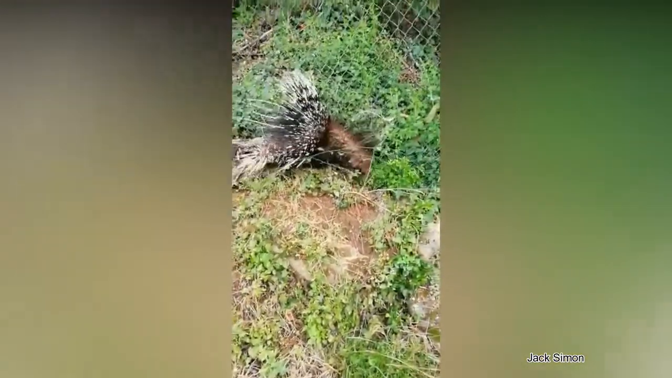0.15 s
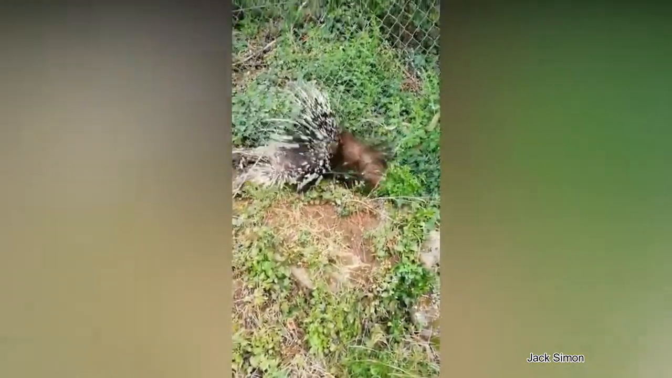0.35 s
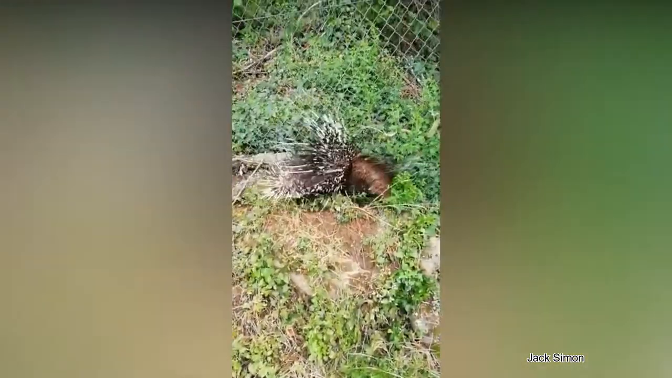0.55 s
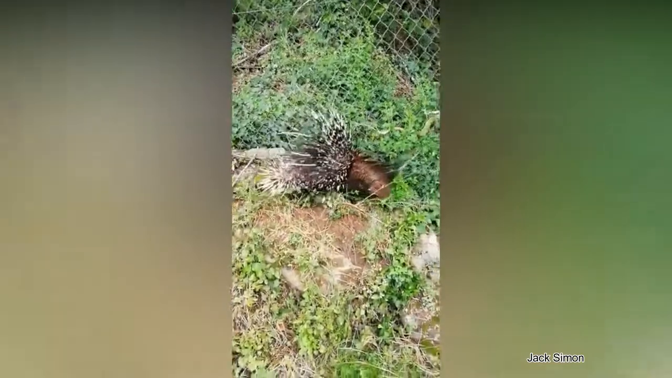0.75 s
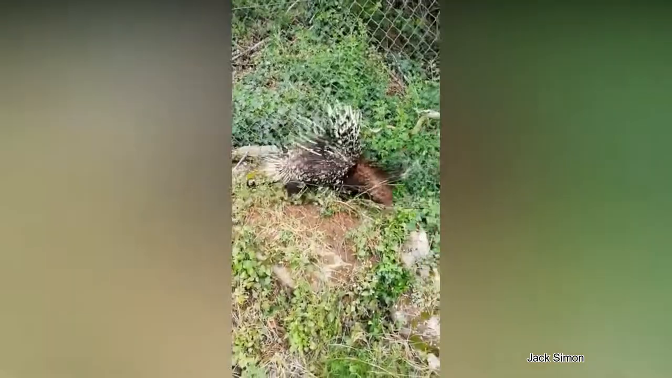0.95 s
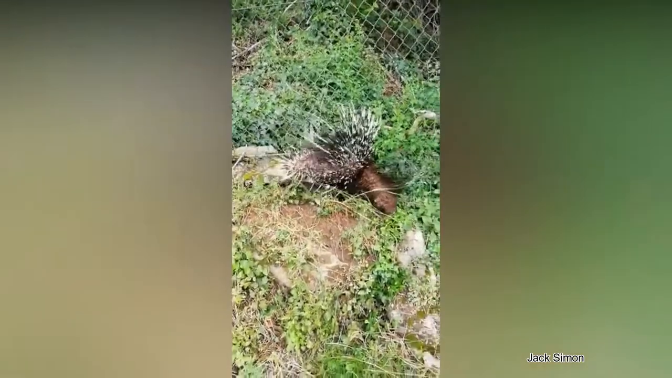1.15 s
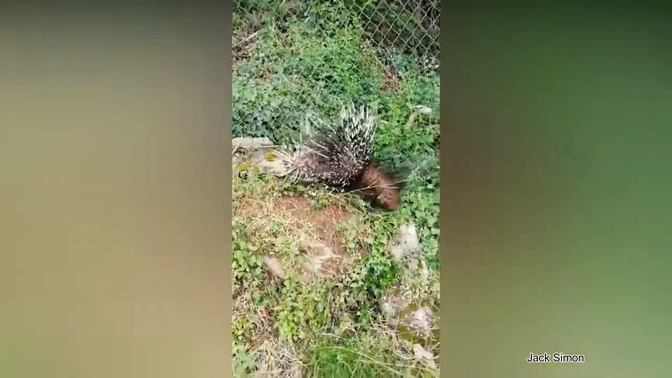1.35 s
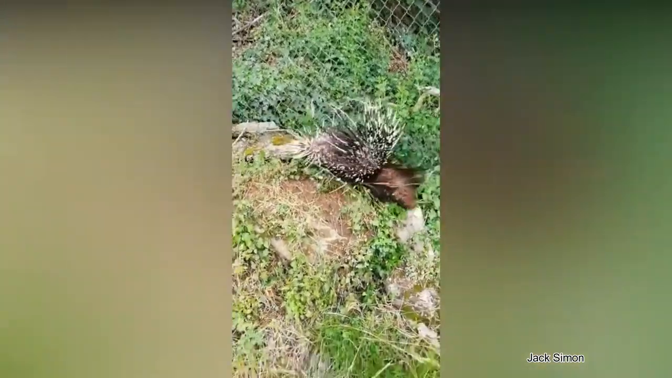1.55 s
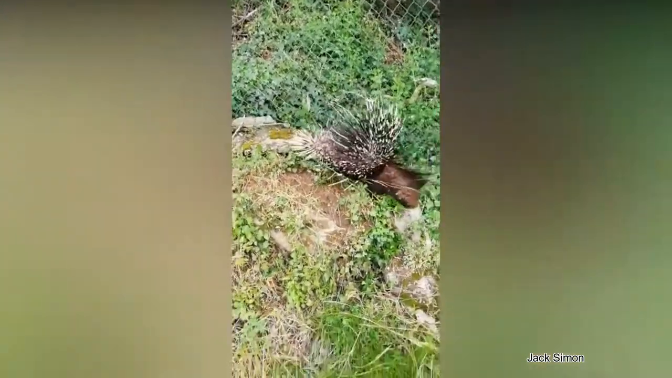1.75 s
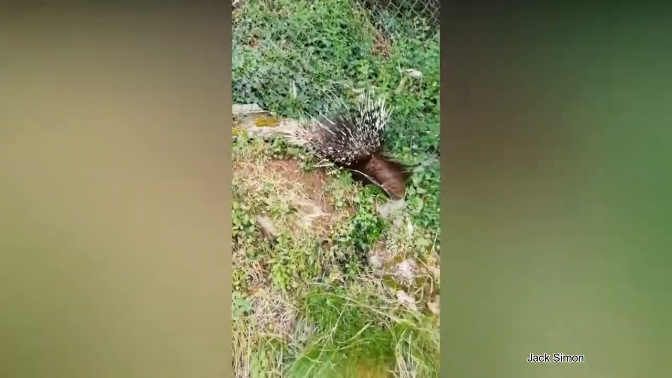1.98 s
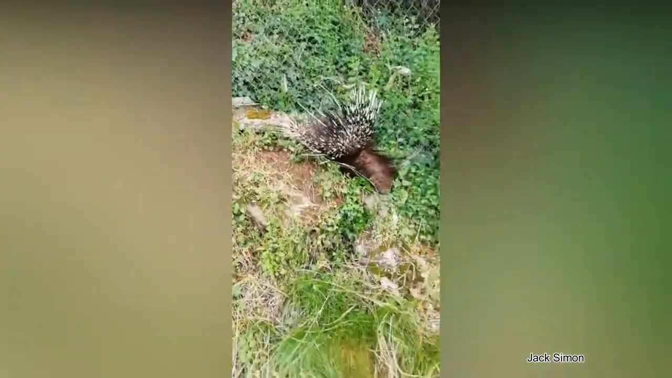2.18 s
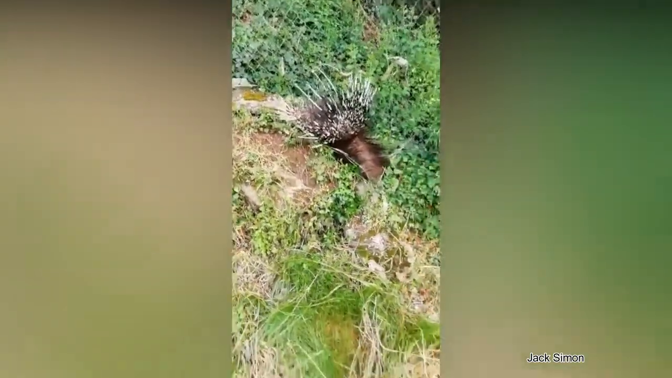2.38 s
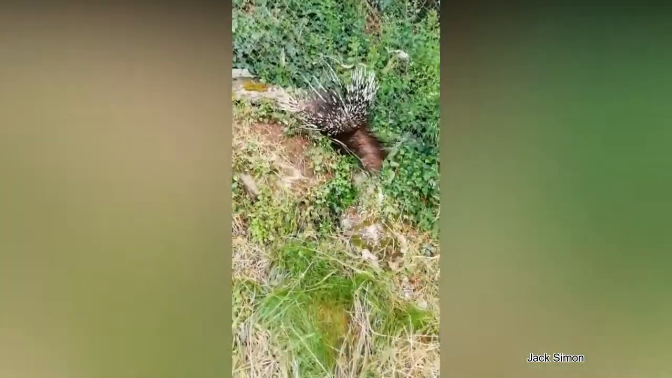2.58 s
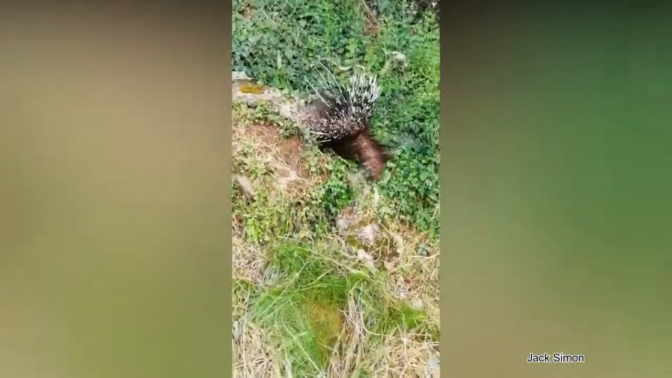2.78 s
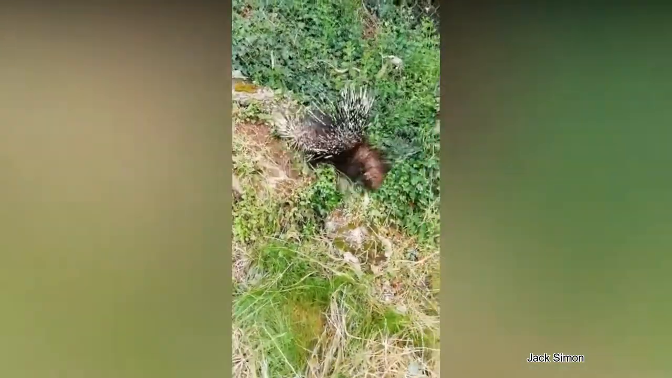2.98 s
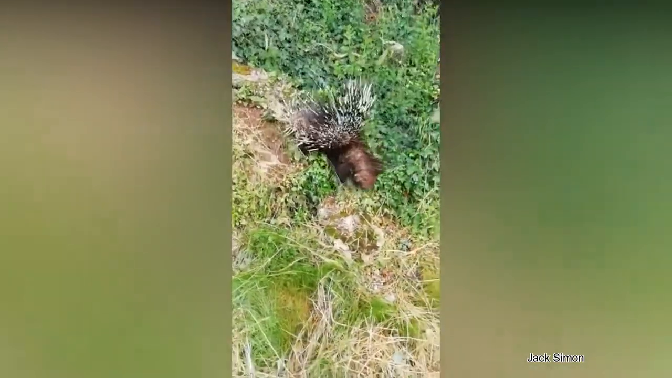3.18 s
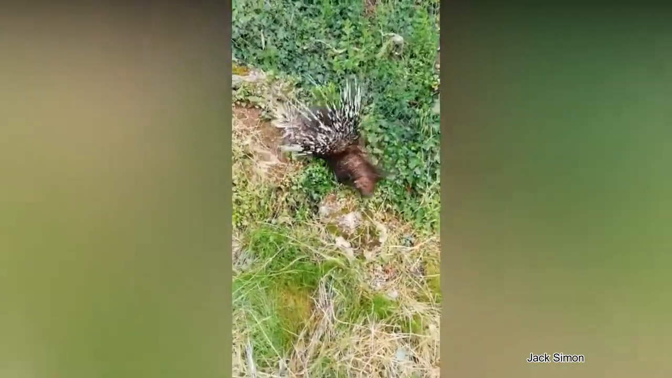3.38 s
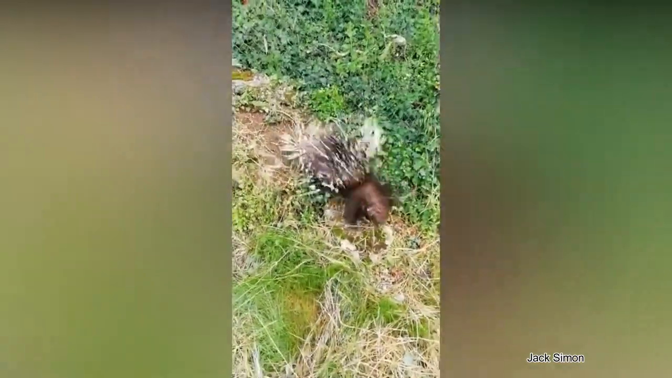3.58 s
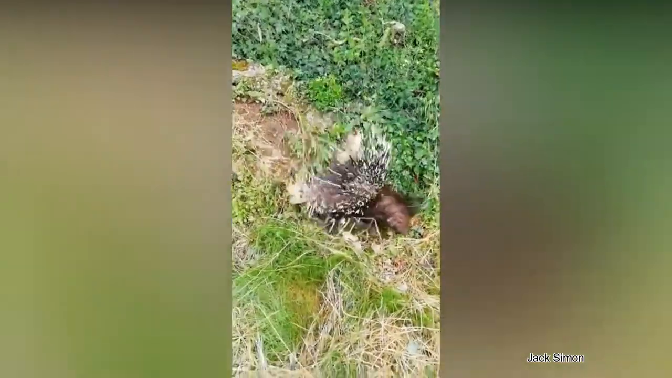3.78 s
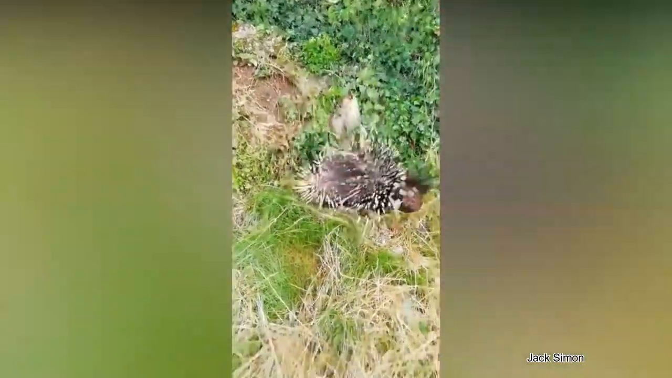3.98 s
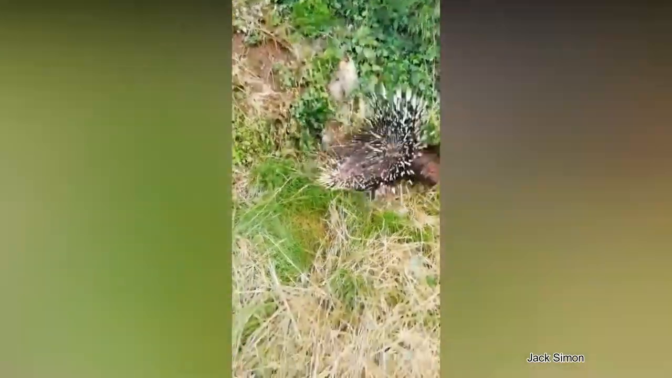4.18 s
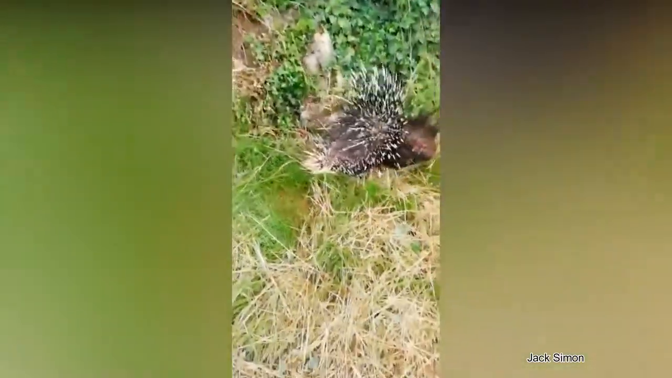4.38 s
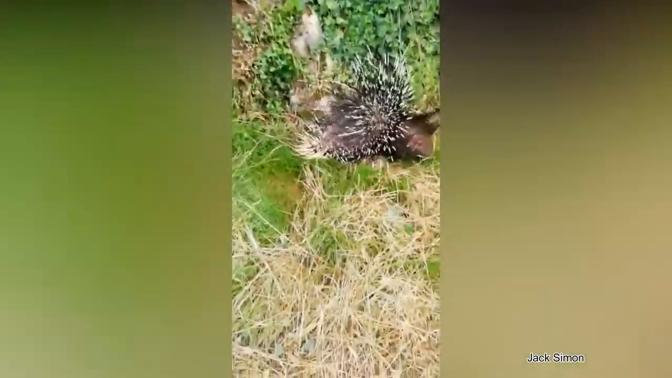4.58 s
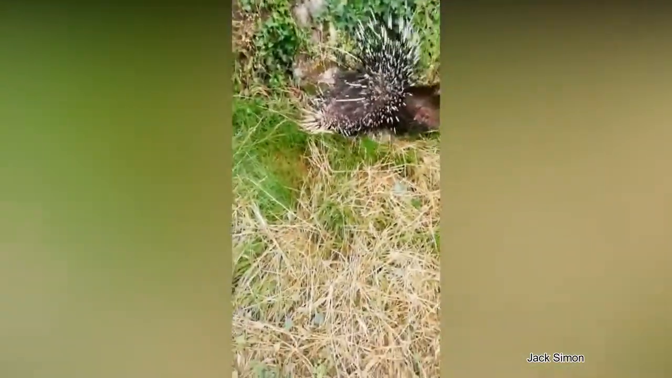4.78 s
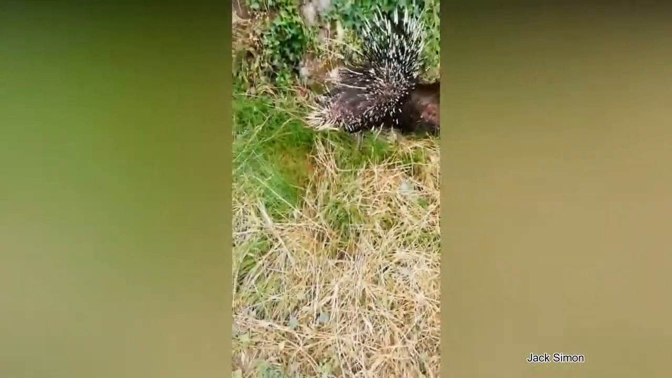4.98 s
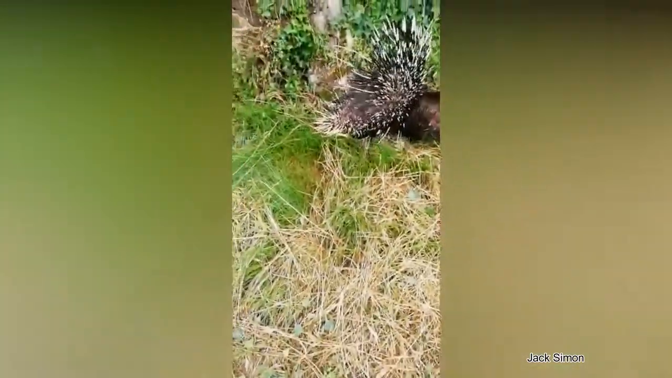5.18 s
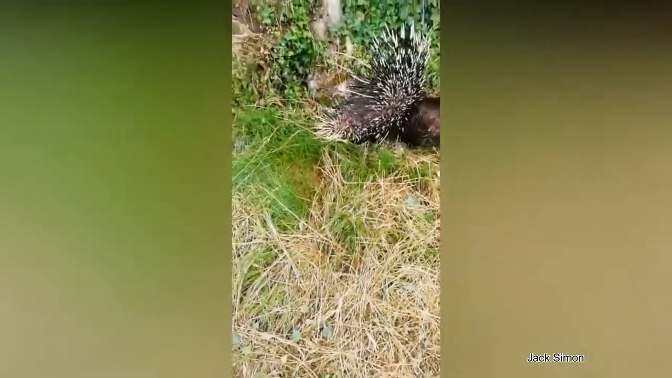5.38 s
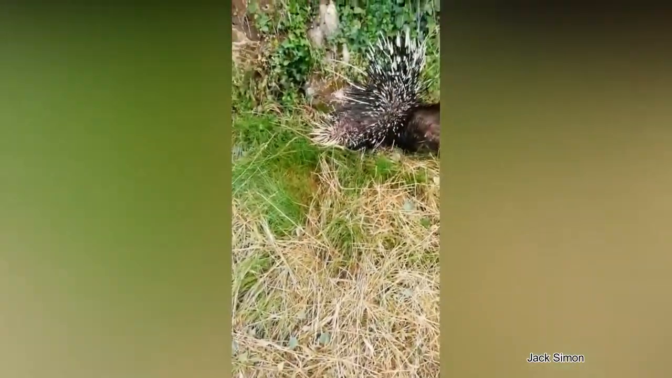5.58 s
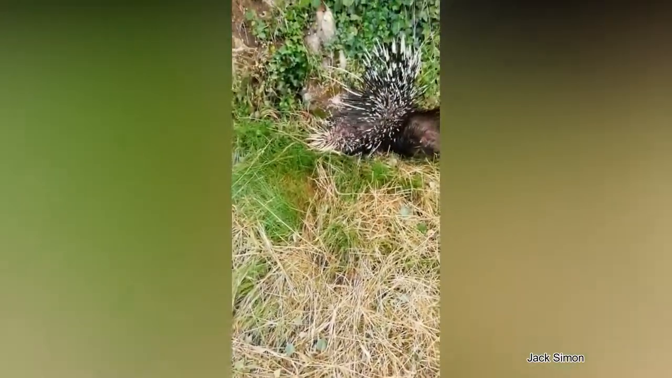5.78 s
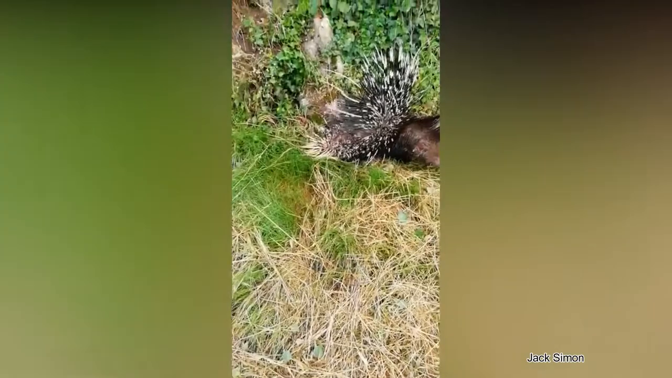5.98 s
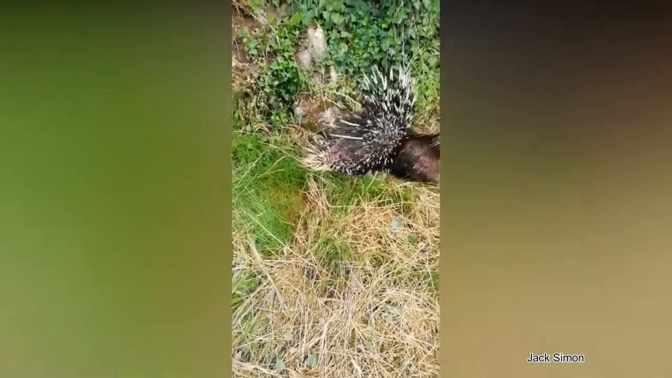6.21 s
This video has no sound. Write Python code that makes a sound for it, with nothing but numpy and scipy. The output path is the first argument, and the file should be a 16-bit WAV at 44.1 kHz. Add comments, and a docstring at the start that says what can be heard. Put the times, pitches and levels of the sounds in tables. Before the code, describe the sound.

A frightened porcupine shakes its hollow quills in a dry, hissing, fluttering rattle outdoors, huffing and grunting low, while a nearby bird whistles briefly.

```python
"""A porcupine on the left shakes its hollow tail quills some 25-35 times a second: random knocks ring four
families of short tubes, swelling at each turn of the tail, with hard clashes on top.
It pants in shaped noise: low chest grunts, nasal huffs and brushed grass.
A near bird whistles in fluttering sines, far birds chirp mostly as the rattle dies away, and faint air
hisses throughout."""
import sys
import numpy as np
from scipy import signal
from scipy.io import wavfile
from scipy.ndimage import uniform_filter1d

SR = 44100
rng = np.random.default_rng(int(sys.argv[2]) if len(sys.argv) > 2 else 0)


def store_wav(level_fs):
    """Save 16-bit WAV to argv[1]."""
    pcm = np.round(np.clip(np.atleast_2d(level_fs), -1, 1) * 32767)
    wavfile.write(sys.argv[1], SR, pcm.T.astype(np.int16))


N = 275625


def gain_of(db):
    """Amplitude factor of a level in dB."""
    return 10 ** (np.asarray(db) / 20)


def evened(x):
    """Scale to an RMS of one."""
    return x / np.sqrt(np.mean(x ** 2) + 1e-20)


def read(points, hz):
    """Read a (Hz, value) table along a logarithmic frequency axis."""
    f, value = np.transpose(points)
    return np.interp(np.log(hz + 1), np.log(f + 1), value)


def curves(rows):
    """Every column of a timed table, drawn in straight lines to every sample."""
    s, *columns = np.transpose(rows)
    return [np.interp(np.arange(N) / SR, s, c) for c in columns]


def add(mix, s, sound):
    """Lay a sound into the mix from s seconds on, cut at the end."""
    part = mix[round(s * SR):][:len(sound)]
    part += sound[:len(part)]


def hiss(spectrum, likeness, patchy_db, size):
    """Two-channel noise of a given colour and left-right likeness, with drifting patches."""
    frames, hz = 4 * N // size + 5, np.fft.rfftfreq(size, 1 / SR)
    a, b, c, d, patches = rng.standard_normal((frames, len(hz), 5)).T
    patches = uniform_filter1d(patches, size=8, axis=0)
    patches = evened(uniform_filter1d(patches, size=6, axis=1))
    same = np.clip(read(likeness, hz), -1, 1)[:, None]
    left = a + 1j * b
    right = same * left + np.sqrt(1 - same ** 2) * (c + 1j * d)
    colour_db = read(spectrum, hz)[:, None] + patchy_db * patches
    z = np.array([left, right]) * gain_of(colour_db)
    return evened(signal.istft(z, nperseg=size, noverlap=3 * size // 4)[1][:, :N])


def scatter(x, t60, gap):
    """Sparse reflections of random sign after a gap (s), other ones for each microphone."""
    at = np.arange(0, SR // 2, 20) + rng.integers(0, 20, (2, SR // 40 + 1))
    strength = gain_of(-60 * at / SR / t60) * (at > gap * SR)
    taps = np.zeros((2, SR))
    np.put_along_axis(taps, at, rng.choice([-1., 1.], at.shape) * strength, 1)
    taps = taps / np.linalg.norm(taps[0])
    return signal.fftconvolve(x * np.ones((2, 1)), taps, axes=1)[:, :N]


# Colour of the air. Each row: frequency in Hz, relative level in dB per Hz.
AIR_COLOUR = [(15, -13), (25, 5), (144, -8), (552, -14.5), (1450, -16.5), (1850, -31), (2120, -17),
              (2560, -17.5), (6730, -25), (9050, -33), (13200, -25), (15500, -36)]
# Stereo width of air and grass. Each row: frequency in Hz, left-right likeness from -1 to 1.
WIDTH = [(60, 0.94), (180, 0.68), (550, -0.61), (1650, 0.3), (4970, -0.17), (15000, -0.00051)]
AIR_DB = -69


def air():
    """Faint steady background: wide coloured noise with mild patches."""
    return gain_of(AIR_DB) * hiss(AIR_COLOUR, WIDTH, patchy_db=-1.5, size=1024)


def whistle(hz, db, burr):
    """A near sine; burr is a quick random flutter of pitch and strength."""
    flutter, wobble = (evened(uniform_filter1d(rng.standard_normal(len(hz)), size=300)) for _ in range(2))
    tone = np.sin(2 * np.pi * np.cumsum(hz * (1 + 0.0442 * burr * wobble)) / SR)
    strength = np.sqrt(2) * gain_of(db) * (1 + burr * flutter)
    return strength * tone * signal.windows.tukey(len(hz), .15)


# The near bird, one list a phrase. Each row: time in seconds, pitch in Hz, level in dB, burr from 0 to 1.
NEAR_WHISTLES = [
    [(.07, 2200, -52, 0.46), (.1, 2006, -51.5, 0.73), (.14, 1960, -57, 0.3)],
    [(.16, 2047, -53, 0.1), (.19, 2373, -43.5, 0.06), (.24, 2307, -46, 0.54), (.26, 2280, -68, 0.4),
     (.31, 2410, -46, 0.4)],
    [(.315, 2396, -41, 0.3), (.34, 2683, -47, 0.56), (.4, 2604, -43.5, 0.18), (.43, 2644, -51, 1),
     (.47, 2885, -51, 0.32), (.52, 3200, -56, 0.1)],
    [(1.56, 1890, -48, 0.36), (1.6, 2200, -51, 0.6), (1.62, 2366, -50, 0.9), (1.64, 2150, -49, 0.74),
     (1.675, 2200, -47, 0.71), (1.7, 2170, -65, 0.7)],
    [(1.83, 2680, -57, 0.3), (1.845, 2740, -36.5, 0.64), (1.853, 2750, -58, .3)],
    [(1.858, 2440, -52, 0.1), (1.875, 2700, -41, 0.1), (1.886, 2800, -52, .4)],
    [(1.89, 2630, -48, 0.55), (1.905, 2550, -42, 0.3), (1.918, 2306, -51, .6), (1.928, 2230, -43, 0.55),
     (1.945, 2200, -51, .8), (1.965, 2034, -46, 1), (1.99, 1980, -66, 0.9)],
    [(2.44, 1730, -56, 0.47), (2.5, 2078, -47, 0.61), (2.57, 2570, -38.5, 0.11), (2.61, 2800, -43.5, 0.12),
     (2.64, 2660, -57, 0)],
    [(6.02, 2050, -63, 0.06), (6.05, 2020, -76, 0.2), (6.065, 2437, -63, 0.02), (6.11, 2420, -62, 0.36),
     (6.19, 2336, -65, .5)],
    [(6.127, 3200, -69, 0.3), (6.148, 4354, -47.5, 0.14), (6.175, 4235, -47, 0.45),
     (6.195, 4220, -59, 0.45), (6.21, 4400, -61, 0.4), (6.248, 4250, -64, 0.7)],
]
# The far birds. Each row: start in seconds, length in seconds, first pitch in Hz, pitch it settles towards
# in Hz, glide time constant in seconds, starting level in dB, burr from 0 to 1.
FAR_CHIRPS = [(4.512, 0.11, 7160, 6650, 0.09, -69, 0.4), (4.797, 0.12, 7250, 6640, 0.073, -73, 0.27),
              (4.988, 0.14, 7060, 6620, 0.049, -76.5, 0.3), (5.168, 0.1, 6970, 6650, 0.08, -75.5, 0.17),
              (4.863, 0.021, 4630, 4440, .012, -71, 0.1), (4.869, 0.023, 3890, 3410, 0.011, -61, 0.05),
              (4.905, 0.025, 3900, 3300, 0.0078, -68, .05), (4.922, 0.032, 3220, 2730, 0.015, -65, 0.3),
              (5.011, 0.015, 3770, 3550, 0.013, -67, 0.5), (5.023, 0.052, 3080, 2550, 0.0096, -69, 0),
              (4.958, .36, 2040, 1938, .2, -77.5, 0.34), (5.202, 0.028, 3690, 3300, 0.0073, -62.5, 0.25),
              (5.22, .04, 3030, 2510, 0.013, -70.5, 0.2), (5.376, 0.157, 2343, 2200, 0.095, -72.5, 0.82),
              (5.7, .09, 8300, 8050, 0.051, -87, 0), (5.87, 0.15, 8300, 8120, 0.065, -84, 0.04),
              (5.716, .1, 4000, 4000, .06, -88, 0.13), (5.803, 0.19, 3200, 3105, 0.048, -73.5, 0.52),
              (5.905, 0.085, 4080, 4010, 0.045, -78, 0.19)]


def birds():
    """Gliding whistles: the near bird has weaker, shorter echoes; far birds ring on among the trees."""
    near, far = np.zeros(N), np.zeros(N)
    for phrase in NEAR_WHISTLES:
        first_s, last_s = phrase[0][0], phrase[-1][0]
        span = slice(round(first_s * SR), round(last_s * SR))
        add(near, first_s, whistle(*(c[span] for c in curves(phrase))))
    for s, length, first_hz, last_hz, glide, db, burr in FAR_CHIRPS:
        t = np.arange(0, length, 1 / SR)
        hz = last_hz + (first_hz - last_hz) * np.exp(-t / glide)
        add(far, s, whistle(hz, db - 7 * t / length, burr))
    # a few samples between the microphones place the near bird left, the far ones slightly right
    direct = np.array([near + far, np.roll(near, 4) + np.roll(far, -1)])
    near_echo = gain_of(-4) * scatter(near, 0.23, 0.0055)
    far_echo = gain_of(2.5) * scatter(far, 0.54, 0.0082)
    return direct + near_echo + far_echo


# The tail's beat. Each row: time in seconds, swings so far.
TAIL_SWINGS = [(0.057, 0), (0.383, 8), (0.527, 12), (0.842, 20), (1.121, 28), (1.562, 40), (1.981, 52),
               (2.133, 56), (2.778, 72), (2.924, 76), (3.05, 80), (3.338, 88), (3.596, 96), (4.062, 112),
               (4.442, 124), (4.848, 136)]
# The shake. Each row: time in seconds, left lean in dB, depth of the beat in dB, both before each family
# takes its share.
SHAKE_MOVES = [(0.0, 10.5, 0), (0.12, 5.5, 14), (0.68, 14, 24), (1.28, 11, 8), (2.2, 10, 23.5),
               (3.75, 9, 7.5), (3.99, 10, 29), (4.15, 8, 20), (4.53, 11, 29), (4.78, 8.5, 21), (4.9, 2, 23)]


def beat():
    """Strength in dB along each swing: highest at the turn of the tail, then sagging to a short gap."""
    s, count = np.transpose(TAIL_SWINGS)
    t = np.arange(N) / SR
    # 26 swings per s before the table, 30 after it
    outside = 26 * np.minimum(t - s[0], 0) + 30 * np.maximum(t - s[-1], 0)
    swing = np.interp(t, s, count) + outside + 0.18
    force_db = 1.3 * rng.standard_normal(size=250)[abs(swing).astype(int)]  # no two swings alike
    _, depth_db = curves(SHAKE_MOVES)
    return uniform_filter1d(force_db - depth_db * (swing % 1) ** 1.8, size=180)


# The rattle. Each row: time in seconds, then level in dB of thin quills, long tubes and dry fizz, before
# each family's trim.
RATTLE_LEVELS = [(0.0, -56, -54.5, -64), (0.18, -60, -56.5, -67), (0.42, -57.5, -58, -60),
                 (0.62, -56, -60, -66), (1.03, -55, -56, -57.5), (1.22, -52.5, -49, -57.5),
                 (1.51, -51.5, -54, -53.5), (1.62, -53, -61.5, -59.5), (1.89, -52.5, -53.5, -57.5),
                 (2.3, -54.5, -59.5, -65), (2.66, -56, -72, -68), (2.86, -53, -60.5, -50.5),
                 (3.12, -56.5, -64, -63), (3.4, -55, -66, -63.5), (3.57, -49.5, -55, -57),
                 (3.69, -49, -60, -49), (3.78, -46, -51, -45), (4.05, -50, -55, -56),
                 (4.21, -43.5, -52.5, -50), (4.4, -49.5, -60.5, -59.5), (4.74, -55.5, -55, -64.5),
                 (4.86, -65, -64.5, -72.5), (4.93, -71, -74.5, -77), (5.05, -94, -86, -83.5),
                 (5.85, -92.5, -84, -83.5), (6.25, -59.5, -64, -65.5)]
ARCH_DB = 4.5  # a breath is strongest in the middle of its hold


def breaths(rows, edges, undertone_db):
    """Gain along time of each column: every breath swells, holds and fades over a faint murmur."""
    start, length, *columns = np.array(rows)[:, :, None].transpose(1, 0, 2)
    swell, fade = edges
    t_fine = np.arange(N) / SR
    t = t_fine[::50]
    shape_db = -swell * np.maximum(start - t, 0) - fade * np.maximum(t - start - length, 0)
    shape_db = shape_db - ARCH_DB * (2 * np.clip((t - start) / length, 0, 1) - 1) ** 2
    murmur_db = curves(RATTLE_LEVELS)[0]  # the murmur follows the thin quills
    gains = []
    for db, low_db in zip(columns, undertone_db):
        breath = np.interp(t_fine, t, gain_of(db + shape_db).max(0))
        gains.append(breath + gain_of(murmur_db + low_db))
    return gains


# Chest grunts. Each row: start in seconds, length in seconds, level in dB mid-hold.
CHEST_GRUNTS = [(.03, 0.049, -58.5), (.31, 0.086, -62), (.58, 0.058, -57), (.86, 0.14, -51.5),
                (1.1, 0.027, -65), (1.2, 0.14, -55.5), (1.48, 0.069, -56.5), (1.78, 0.086, -53),
                (2.02, 0.11, -50.5), (2.3, 0.12, -53.5), (2.61, 0.062, -57), (2.89, 0.1, -53.5),
                (3, 0.16, -59.5), (3.19, 0.09, -53), (3.51, 0.12, -51), (3.74, 0.23, -48),
                (3.98, 0.077, -48), (4.13, .1, -46.5), (4.27, 0.14, -60.5), (4.44, .11, -49.5),
                (4.7, .16, -56), (6.03, 0.087, -55.5), (6.16, 0.072, -54.5)]
# Huffs, each with a move in the grass. Each row: start in seconds, length in seconds, then huff and swish
# level in dB mid-hold.
NOSE_HUFFS = [(.05, 0.24, -64.5, -67), (.75, 0.19, -53, -65), (.91, 0.023, -48.5, -48),
              (.96, 0.054, -55, -55), (1.06, .1, -50, -54.5), (1.2, 0.092, -54, -47.5),
              (1.32, 0.26, -61, -60.5), (1.65, 0.045, -64, -70), (1.8, 0.14, -65, -60),
              (1.93, 0.083, -55.5, -59.5), (2.05, 0.08, -60.5, -51.5), (2.22, 0.06, -57.5, -59.5),
              (2.34, 0.069, -62, -57), (2.64, 0.048, -71, -63), (2.85, 0.15, -75, -62),
              (3.1, 0.13, -67, -71), (3.24, 0.066, -58, -59), (3.38, 0.046, -64.5, -64),
              (3.53, 0.24, -68, -61), (3.72, 0.091, -48, -52.5), (3.84, .1, -52, -53.5),
              (4.03, 0.087, -49.5, -58), (4.15, 0.065, -64, -58), (4.33, 0.066, -59.5, -63),
              (4.46, 0.042, -85, -57.5), (4.6, 0.21, -66, -65.5), (4.78, 0.089, -72, -71),
              (6.05, 0.076, -77, -68), (6.18, 0.078, -67.5, -69)]
# Colours of chest, nose and brushed grass. Each row: frequency in Hz, relative level in dB per Hz.
CHEST_COLOUR = [(15, -42), (25, -3), (40, 4), (55, -3.5), (144, -5.5), (200, -12), (260, -16), (340, -37)]
NOSE_COLOUR = [(150, -4), (240, -5.5), (330, -5), (447, -1.5), (540, -4.5), (620, -19.5), (750, -29)]
GRASS_COLOUR = [(500, -11), (680, 4), (850, 0.5), (1100, 3), (1350, 5), (1700, -34)]
# Stereo width of the panting. Each row: frequency in Hz, left-right likeness from -1 to 1.
BREATH_WIDTH = [(30, .998), (80, 1), (170, 0.93), (350, 0.8), (700, 1)]
# Murmur of chest, nose and grass, in dB relative to the thin quills of the rattle table.
MURMUR_DB = [-13.5, -17, -15.5]
# Slopes of grunts and huffs: swell before and fade after the hold, in dB per second.
GRUNT_SLOPES = (1500, 390)
HUFF_SLOPES = (870, 1050)


def panting(beat_db):
    """Smooth low air from the chest, jolted by the shaking; a hollow huff through the nose; grass brushed
    by the body."""
    (grunts,) = breaths(CHEST_GRUNTS, GRUNT_SLOPES, MURMUR_DB[:1])
    huffs, swishes = breaths(NOSE_HUFFS, HUFF_SLOPES, MURMUR_DB[1:])
    chest = hiss(CHEST_COLOUR, BREATH_WIDTH, patchy_db=1.25, size=2048)
    # a steady push of air
    chest = chest / np.sqrt(uniform_filter1d((chest ** 2).mean(0), size=2600) + 0.075)
    grunt = grunts * gain_of(0.2 * beat_db) * chest
    huff = huffs * hiss(NOSE_COLOUR, BREATH_WIDTH, patchy_db=2.5, size=512)
    huff[1] = np.roll(huff[1], round(SR * 0.00041))  # it comes from the left
    grass = hiss(GRASS_COLOUR, WIDTH, patchy_db=3.0, size=256)
    swish = swishes * gain_of(0.21 * beat_db) * grass
    return grunt + (huff + swish) * gain_of([[1.6], [-1.6]])


def tubes(family, knocks, lag, count=9):
    """Knocks ring quills picked at random, each with its own length and path to the far microphone."""
    t, out = np.arange(SR // 40) / SR, np.zeros((2, N))
    # a touch is brief: the quill is picked anew every five samples
    quill = np.repeat(rng.integers(0, count * len(family), N // 5 + 1), 5)[:N]
    for k, (hz, spread, t60, db) in enumerate(family * count):
        tune = (k // len(family) + rng.random()) * 2 / count - 1
        path = rng.uniform(-1.2, 1)
        fade = np.exp(-np.log(1000) * t / t60)
        fade = fade * (1 - np.exp(-t / (0.041 * t60)))  # the air in the tube takes a moment to speak
        tone = np.sin(2 * np.pi * hz * (1 + 1.434 * spread * tune) * t)
        ring = gain_of(db) * fade * tone / np.linalg.norm(fade)
        sound = signal.oaconvolve(knocks * (quill == k), ring)[:N]
        out[0] += sound
        out[1] += np.roll(sound, round(SR * lag * (1 + 0.34 * path)))
    return out


# Quill tubes, one list a family: thin, long, middle, fizz. Each row: centre pitch in Hz, relative scatter
# of the tuning, decay by 60 dB in seconds, relative level in dB.
QUILL_TUBES = [
    [(4027, 0.071, 0.0067, 0.5), (4694, 0.014, 0.0024, -2), (5440, 0.11, 0.0046, -3),
     (6333, 0.066, 0.0067, -5)],
    [(1260, 0.074, 0.0022, -6.5), (1445, 0.031, 0.021, -1), (1590, 0.055, 0.0077, -5.5),
     (1796, 0.074, 0.011, 1.5)],
    [(2200, 0.087, 0.011, -3), (2700, 0.097, 0.0078, 0.5), (3200, 0.086, 0.02, -0.5)],
    [(8900, 0.4, 0.00067, -1), (10480, 0.054, 0.0034, -3.5), (12540, 0.023, 0.0009, -0.5),
     (15100, 0.087, .003, 1.5)],
]
# The hardest clashes. Each row: time in seconds, peak in dB before the trim, then long and middle tubes
# in dB relative to that peak.
HARD_CLASHES = [(0.622, -35.5, -21, -12), (0.718, -49, -17, -8), (0.7935, -43.5, -12, 4),
                (0.9712, -47.5, -6, 10), (1.1194, -37, -20, -1), (1.1975, -41.5, 2, 4),
                (1.3328, -36.5, -8, -13), (1.4094, -32, -15, -17), (1.4857, -31.5, -13, -12),
                (1.523, -29, -11, -14), (1.5599, -31, -6, -18), (1.693, -33.5, -6.5, -12),
                (1.8408, -35, -8, -18), (1.9401, -30, -10, -18), (1.972, -41, -23, -18),
                (2.0873, -38, -5, -17), (2.1075, -34, -7, -7), (2.2453, -30, -16, -12),
                (2.287, -39, -12, -5), (2.3645, -33.5, -17, -22), (2.692, -37.5, -25, -6.5),
                (2.7306, -34.5, -29, -11), (3.2665, -45, -20, -23), (3.4003, -32, -15, -20),
                (3.5294, -33, -7, -10), (3.5618, -28, -13, -10), (3.593, -25.5, -14, -17),
                (3.6148, -29, -11, -6), (3.7672, -33.5, -11, 5.5), (3.8257, -38, 2, 9),
                (3.8534, -34.5, -9, 2.5), (3.8836, -33, -12, 1), (3.9135, -27.5, -18, -3),
                (3.9436, -39, -17, -3), (3.9708, -23.5, -12, -6.5), (4.001, -31, -13, 0.5),
                (4.0297, -23.5, -6.5, -6.5), (4.0884, -33, -15, -1), (4.116, -22, -15, -5),
                (4.151, -36, -18, -9), (4.1823, -25.5, -16, -14), (4.2144, -26.5, -16, -10),
                (4.2467, -28, -17, -11), (4.275, -28, -13, -14), (4.3194, -28, -20, -15),
                (4.342, -30, -17, -3), (4.371, -26.5, -18, -12), (4.4044, -32, -8.5, -8),
                (4.4704, -32, -9, -12), (4.5022, -28, -10.5, -11), (4.539, -36, -20, -19),
                (4.6384, -38, -9, -0.5), (4.6771, -27.5, -14, -18)]
# One value a family: trim of the rattle in dB, and trim of the clashes in dB.
FAMILY_TRIM_DB = [4.33, 8.5, 11.64, 5.25]
CLASH_TRIM_DB = [4, 13.5, 12.5, -3]
# One value a family: share of the left lean (thin quills lean most, long tubes least), share of the beat.
LEAN_SHARE = [1.136, 0.19, 0.74, 0.9]
BEAT_SHARE = [0.51, 0.19, 0.61, 0.28]
# One value a family: typical lateness at the right microphone in seconds.
RIGHT_LAG_S = [0.00023, 0.00013, 0.00016, 0.00045]
# middle tubes sit below the thin quills and lean this share towards the long tubes
MIDDLE_DB, MIDDLE_LEAN = -6, 0.24
LEAD_S, LEAD_DB = .004, -14  # lighter touches gather just before a clash
TINT_DB = 1.53  # each family drifts on its own
PATTERN_TURNS_PER_S = 1.7


def quills(beat_db):
    """Knocks swell at each turn of the tail and weaken during the swing; clashes are short dense bursts."""
    force = gain_of(1.55 * rng.exponential(1, N).clip(0, 2.6))
    collisions = force * (rng.random(N) < 700 / SR)  # some 700 a second
    collisions = uniform_filter1d(collisions, size=14)  # each lasts under a millisecond
    out, t = np.zeros((2, N)), np.arange(SR // 100) / SR
    after = np.maximum(t - LEAD_S, 0)
    onset = np.minimum(after / 0.00052 + gain_of(LEAD_DB) * t / LEAD_S, 1)
    clash = onset * np.exp(-after / 0.0008)
    thin_db, long_db, fizz_db = curves(RATTLE_LEVELS)
    middle_db = thin_db + MIDDLE_DB + MIDDLE_LEAN * (long_db - thin_db)
    left_lean_db, _ = curves(SHAKE_MOVES)
    for k, (family, level_db) in enumerate(zip(QUILL_TUBES, [thin_db, long_db, middle_db, fizz_db])):
        tint = evened(uniform_filter1d(rng.standard_normal(N), size=1200))
        pulse = gain_of(BEAT_SHARE[k] * beat_db + TINT_DB * tint)
        pulse = pulse / np.sqrt(uniform_filter1d(pulse ** 2, size=6000))
        # hard collisions over countless light touches, most of them in the fizz
        touches = (evened(collisions) + 0.41 + 1.24 * (k == 3)) * rng.standard_normal(N)
        knocks = gain_of(level_db + FAMILY_TRIM_DB[k]) * pulse * evened(touches)
        dusts = rng.choice([-1., 1.], (len(HARD_CLASHES), len(t)))
        for (at, db, long_rel_db, middle_rel_db), dust in zip(HARD_CLASHES, dusts):
            clash_db = db + [0, long_rel_db, middle_rel_db, 0][k] + CLASH_TRIM_DB[k]
            add(knocks, at - LEAD_S, gain_of(clash_db) * dust * clash)
        lean = gain_of(LEAN_SHARE[k] * left_lean_db * [[.5], [-.5]])
        out += tubes(family, knocks, RIGHT_LAG_S[k]) * lean
    # thin tubes radiate no bass
    out = signal.sosfilt(signal.butter(4, 1050, "high", fs=SR, output="sos"), out)
    # three random echo patterns of grass and ground fade into one another, so no single one colours the rattle
    turn = 2 * np.pi * PATTERN_TURNS_PER_S * np.arange(N) / SR
    weights = np.sqrt(2 / 3) * np.cos(turn + np.pi / 3 * np.arange(3)[:, None])
    return out + gain_of(-5.5) * sum(scatter(out * w, 0.025, 0.00085) for w in weights)


def scene():
    """Air, birds, and the panting and rattle that share one tail beat."""
    beat_db = beat()
    return air() + birds() + panting(beat_db) + quills(beat_db)


EDGE_HZ = 15500


def record(dry):
    """The small microphones lose the deepest bass; then a steep filter ends the treble at EDGE_HZ."""
    thin = signal.sosfilt(signal.butter(4, 40, "high", fs=SR, output="sos"), dry)
    treble_limit = signal.firwin(511, EDGE_HZ, window=("kaiser", 9), fs=SR)
    return signal.oaconvolve(thin, treble_limit[None], "same")


dry = scene()
out = record(dry)
store_wav(out)
```